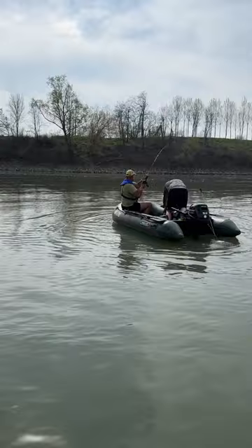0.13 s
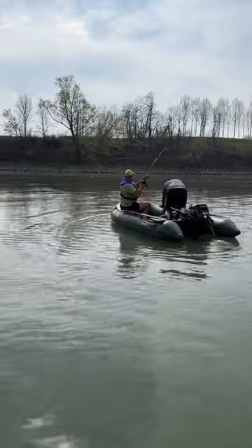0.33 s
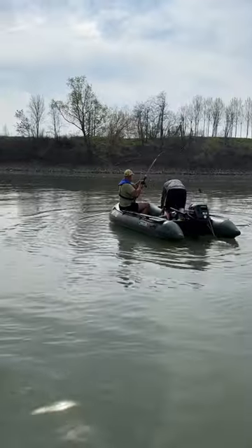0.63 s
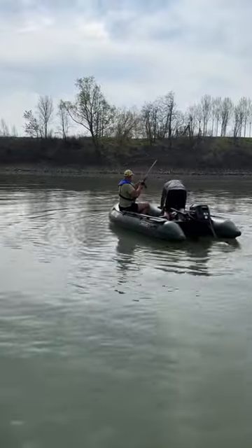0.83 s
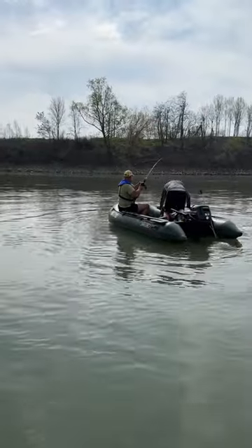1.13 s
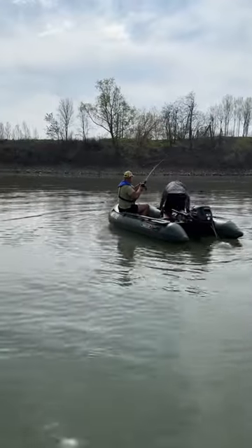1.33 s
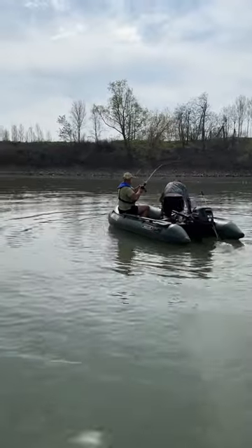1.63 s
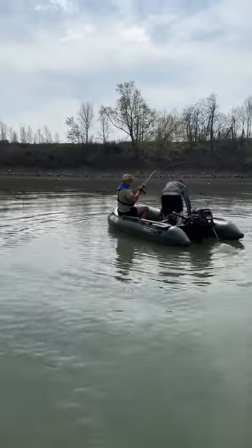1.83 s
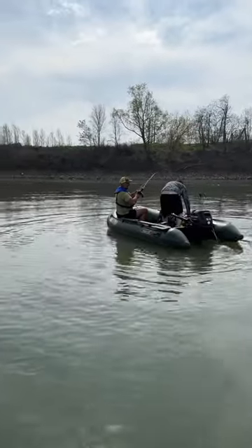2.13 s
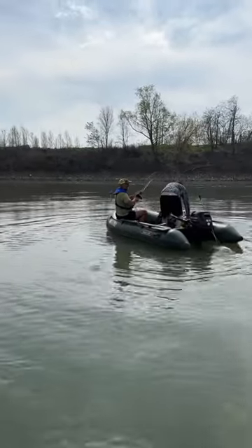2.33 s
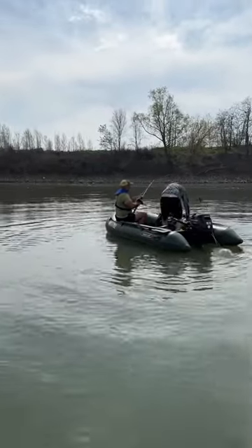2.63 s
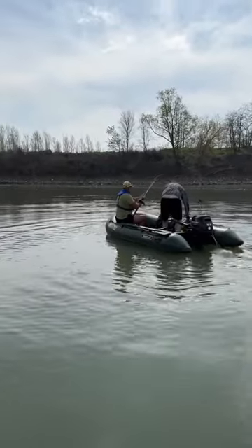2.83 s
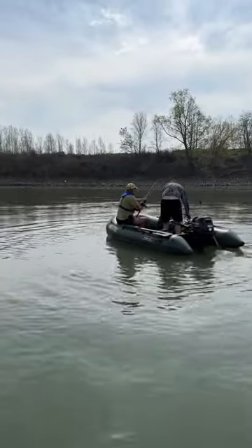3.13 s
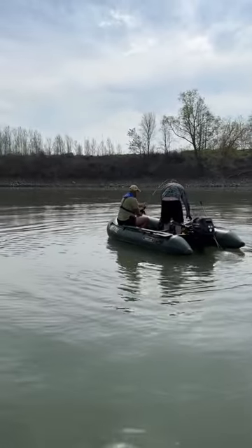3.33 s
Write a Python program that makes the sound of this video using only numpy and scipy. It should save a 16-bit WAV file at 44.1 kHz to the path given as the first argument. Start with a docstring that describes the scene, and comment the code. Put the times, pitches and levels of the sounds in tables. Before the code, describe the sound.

A small outboard motor idles with a steady low puttering hum, water trickling, one hard knock.

```python
"""On a calm river, two small outboard motors idle. The close one thuds: each firing puffs through its wet exhaust.
The slower one hums in steady tones, whirs in falling gear chirps, clatters in shaped noise and whines in bursts.
Something hard knocks on a boat and rattles: short ringing tones with bursts of noise.
A few drops plip as rising tones with tiny splashes; a thin stream patters as many random clicks over a hiss."""
import sys
import numpy as np
from scipy import signal
from scipy.fft import rfft, irfft
from scipy.io import wavfile

SR = 44100
rng = np.random.default_rng(int(sys.argv[2]) if len(sys.argv) > 2 else 0)


def materialize(psi):
    """Save the field psi as 16-bit PCM at rate SR to the path in sys.argv[1].

    A 1-D psi becomes a single channel; in a 2-D psi each row is a channel.
    """
    bounded = np.clip(np.atleast_2d(psi).T, -1, 1)
    quanta = np.round(bounded * 32767).astype(np.int16)
    wavfile.write(sys.argv[1], SR, quanta)


N = 153027
T, HZ = np.arange(N) / SR, np.fft.rfftfreq(N, 1 / SR)


def amp(db):
    """Turns decibels into gain."""
    return 10 ** (np.asarray(db) / 20)


def unit(x):
    """Scales a sound to an average (rms) strength of 1."""
    return x / np.sqrt(np.mean(x ** 2) + 1e-20)


def read(points, hz):
    """Reads a table between its points, on a log-frequency axis."""
    f, value = np.transpose(points)
    return np.interp(np.log(hz + 1e-6), np.log(f), value)


def curve(points):
    """Reads a table over time."""
    return np.interp(T, *np.transpose(points))


def add(mix, s, sound):
    """Mixes a sound in, starting at s seconds."""
    start = max(round(s * SR), 0)
    part = mix[..., start:][..., :sound.shape[-1]]
    part += sound[..., :part.shape[-1]]


def drift(rate_hz):
    """Makes a smooth random curve with rms 1; a higher rate changes faster."""
    slow = rfft(rng.standard_normal(N)) * np.exp(-(HZ / rate_hz) ** 2)
    return unit(irfft(slow, N))


def pan(db):
    """Gives left and right gains that differ by this many dB."""
    db = np.atleast_1d(db)
    return amp(np.array([db, -db]) / 2)


# how alike the two microphones hear a sound: (frequency [Hz], likeness [0-1])
LIKENESS = [(50, 1), (110, .05), (300, 0.72), (480, 0.39), (700, 0.19), (1100, 1), (1400, 0.7),
            (2230, 0.97), (2700, 0.51), (4400, 0.31), (5000, 1), (6500, 1), (9500, 0.59), (11000, 1)]
# how much louder the left one is: (frequency [Hz], left over right [dB])
BALANCE = [(80, -2), (200, -10.5), (320, -5), (460, -8.5), (600, -10), (750, -14), (900, -13.5),
           (1050, -8.5), (1400, -0.5), (1800, -2.5), (2250, 2.5), (3500, 3.5), (6500, 0), (12000, -0.5)]
# how far the left one is ahead: (frequency [Hz], phase lead [radians])
LEFT_LEAD = [(400, 0.5), (560, 1.56), (720, 2.5), (850, 1), (1100, -0.45), (1400, 1), (1700, -0.15),
             (2250, 0.65), (2800, 0.5), (4500, -0.35), (4900, 2.5), (5300, 2), (5900, -1.5), (7000, -0.5),
             (9000, -1.46), (11000, -3), (16000, -16)]


def spread(pair, gain):
    """Colours two unrelated signals and blends them as the two microphones hear them."""
    left, other = rfft(pair) * gain
    same = np.clip(read(LIKENESS, HZ), 0, 1)
    right = same * left + np.sqrt(1 - same ** 2) * other
    right = right * np.exp(-1j * read(LEFT_LEAD, HZ))
    return unit(irfft(np.array([left, right]) * pan(read(BALANCE, HZ)), N))


def turns_from(turns, at):
    """Distance in turns to the nearest moment when the engine cycle is at this angle."""
    return (turns - at + .5) % 1 - .5


def strokes(turns, table, base):
    """Level that swells at set angles of each engine cycle."""
    swells = sum(size * np.exp(-(turns_from(turns, at) / length) ** 2) for at, length, size in table)
    return base + swells


# pace of the close motor: (time [s], rate [firings/s])
FIRING_RATE = [(0, 25.852), (0.3, 24.963), (0.62, 25.31), (0.95, 24.798), (1.15, 25.568), (1.65, 25.286),
               (1.95, 24.607), (2.2, 24.347), (2.62, 24.657), (2.95, 24.144), (3.25, 24.196),
               (3.47, 23.417)]
# tone colour of its exhaust: (multiple of the average firing rate, relative level [dB])
EXHAUST_TONES = [(1, -47), (2, -7), (3, 0), (4, -4.5), (5, -14), (6, -17), (7, -20.5), (9, -31.5),
                 (12, -22), (16, -36)]
# rise and fall of the exhaust: (time [s], relative level [dB])
EXHAUST_LEVEL = [(0, -2), (.45, -1), (.7, 0), (1.25, -1), (1.5, 0.5), (2.0, -0.5), (2.8, -1.5), (3.47, 0.5)]
EXHAUST_DB, UNEVEN_DB, JITTER_S = -31, 0.65, 0.00019  # the last two vary each puff's size and moment
PUFF_TURN, PUFF_LEAN = 0.136, .33  # when a puff comes, in firings; its lopsidedness, in turns of phase
SMEAR_TURNS, PIPE_ORDER = .0045, 3.1  # strength of the delay; multiple that is delayed least


def exhaust():
    """One soft puff per firing swells and dies in the exhaust of the close motor."""
    rate = curve(FIRING_RATE)
    firings = np.cumsum(rate) / SR
    at = np.flatnonzero(np.diff(np.floor(firings - PUFF_TURN)))
    puffs = np.zeros(N)
    for s, (size, late) in zip(T[at], rng.standard_normal((len(at), 2))):
        add(puffs, s + JITTER_S * late, amp([UNEVEN_DB * size]))
    order = HZ / rate.mean()
    # tones leave the pipe later the further they lie from PIPE_ORDER
    smear = np.exp(-2j * np.pi * (PUFF_LEAN + SMEAR_TURNS * (order - PIPE_ORDER) ** 3))
    colour = amp(read(EXHAUST_TONES, order)) / (1 + (order / 20) ** 4)  # highest tones softened
    pipe = np.fft.fftshift(irfft(smear * colour, N))
    thuds = unit(signal.fftconvolve(puffs, pipe, "same"))
    return amp(EXHAUST_DB + curve(EXHAUST_LEVEL)) * pan(db=-1.0) * thuds


# pace of the slower motor: (time [s], rate [engine cycles/s])
CYCLE_RATE = [(0, 17.047), (0.5, 17.003), (0.77, 17.238), (0.95, 16.979), (1.5, 17.038), (1.76, 17.262),
              (2.14, 16.615), (2.35, 17.007), (2.82, 17.322), (3.05, 17.173), (3.22, 17.354),
              (3.47, 17.088)]


def slower_motor_turns():
    """Counts the engine cycles of the slower motor, so that its sounds keep the same pace."""
    return np.cumsum(curve(CYCLE_RATE)) / SR


# tones of the hum: (multiple of the cycle rate)
HUM_ORDERS = [3, 4, 6, 7, 8, 9, 10, 12, 14, 16, 17, 18, 19, 20, 22, 24, 26, 31, 32, 34, 48, 57, 64]
# one row for each of those tones: (level [dB rms], left over right [dB])
HUM_LEVELS = [(-52.5, 16), (-44, -2.5), (-47, 0), (-51, -10), (-53.5, -12), (-52.5, -2), (-49, -3),
              (-50, 0.5), (-56, -6.5), (-57, -11.5), (-56, -4), (-46, -5), (-54.5, -10), (-54, -8),
              (-57.5, -4), (-55.5, -8.5), (-59.5, -10), (-59.5, -13), (-50, -9), (-55.5, -0.5), (-52.5, -1),
              (-60.5, -1), (-58.5, 15.5)]
WAVER_DB, WANDER_TURNS = 1.0, 0.0007  # random sway of each tone's level and of the shared turning


def hum(turns):
    """The slower motor hums in wavering tones at whole multiples of its cycle rate."""
    turns = turns + WANDER_TURNS * drift(rate_hz=7.1)
    out = np.zeros((2, N))
    mean_rate = curve(CYCLE_RATE).mean()
    for order, (db, side_db) in zip(HUM_ORDERS, HUM_LEVELS):
        phase = 2 * np.pi * (order * turns + rng.random())
        lead = read(LEFT_LEAD, order * mean_rate)
        level = np.sqrt(2) * amp(db + WAVER_DB * drift(rate_hz=3.4))
        out += level * pan(side_db) * np.cos([phase, phase - lead])
    return out


# rise and fall of the whir: (time [s], level [dB])
WHIR_LEVEL = [(0, -53.5), (1.2, -53), (2.1, -51.5), (2.7, -48.5), (3.47, -51)]
# gear chirps in one cycle: (angle [turns], length [turns], strength, pitch [multiple of the cycle rate])
CHIRPS = [(.06, .07, .55, 67), (.24, .07, .6, 65), (.56, .115, 0.77, 66), (.78, .1, 0.98, 62.5)]
CHIRP_FALL_PER_TURN, CHIRP_ROUGH = 38, .3  # fall of the multiple; random phase sway in radians


def whir(turns):
    """Gear tone: the crank is kicked faster, then slows, so the same falling chirps return every cycle."""
    tone = 0
    for at, length, size, order in CHIRPS:
        since = turns_from(turns, at)
        swell = -(since / length) ** 2
        phase = 2 * np.pi * since * (order - CHIRP_FALL_PER_TURN * since / 2)
        tone = tone + size * np.exp(swell + 1j * phase)
    tone = tone * amp(1.0 * drift(rate_hz=15))
    tone = tone * np.exp(1j * CHIRP_ROUGH * drift(rate_hz=72))
    both_sides = np.real([tone, tone * np.exp(-.6j)])
    return amp(curve(WHIR_LEVEL)) * pan(db=4.5) * unit(both_sides)


# firing strokes in one cycle: (angle [turns], length [turns], strength)
FIRING_STROKES = [(.53, 0.18, 0.33), (.79, 0.11, 0.76), (.96, 0.14, 0.51)]
# valve strokes in one cycle: (angle [turns], length [turns], strength)
VALVE_STROKES = [(.17, 0.095, 0.59), (.69, 0.034, 0.35)]
# colour of the casing's noise: (frequency [Hz], relative level [dB])
CASING_COLOUR = [(20, -14), (45, -5.5), (80, 0.5), (150, -4), (215, -10.5), (300, -5), (400, -8.5),
                 (450, -8.5), (500, -14.5), (560, -9.5), (660, -16.5), (740, -10), (870, -17),
                 (1050, -13.5), (1200, -15), (1500, -21), (2500, -27), (5000, -62), (16000, -86)]
# colour of the valve gear's noise: (frequency [Hz], relative level [dB])
VALVE_COLOUR = [(200, -33), (1200, -2), (1900, -1.5), (2600, -1.5), (3400, -3.5), (4000, -5.5),
                (4900, -4.5), (5600, -10.5), (8000, -6), (10500, -10.5), (12000, -74), (16000, -53)]
# resonances of the cowling: (frequency [Hz], width [Hz], level [dB])
COWLING = [(1710, 42, -61.5), (3154, 29, -61.5), (6183, 64, -63), (7550, 85, -65.5)]
# rise and fall of the cowling's ringing: (time [s], relative level [dB])
RINGING_LEVEL = [(0, -1.5), (.7, 2), (1.5, 2), (2.2, -1.5), (2.7, 1), (3.47, 0.5)]
CASING_DB, VALVES_DB = -40, -49.5


def clatter(turns):
    """Firings shake the casing; valves rattle and ring the cowling, all made of noise that swells each cycle."""
    thumps, ticks, rings = rng.standard_normal((3, 2, N))
    thumps = thumps * strokes(turns, FIRING_STROKES, base=1.0)
    casing = spread(thumps, amp(read(CASING_COLOUR, HZ)))
    ticks = ticks * strokes(turns, VALVE_STROKES, base=1.0) * amp(1.96 * drift(rate_hz=66))
    valves = spread(ticks, amp(read(VALVE_COLOUR, HZ)))
    power = sum(amp(db) ** 2 / width / (1 + ((HZ - hz) / width) ** 2) ** 2 for hz, width, db in COWLING)
    rings = rings * amp(curve(RINGING_LEVEL)) * strokes(turns, VALVE_STROKES, base=0.44)
    cowling = spread(rings, np.sqrt(power))
    cowling_gain = np.linalg.norm([amp(db) for _, _, db in COWLING])  # all resonances together
    return amp(CASING_DB) * casing + amp(VALVES_DB) * valves + cowling_gain * cowling


# bursts of the whine: (time [s], level [dB])
WHINE_LEVEL = [(0, -53), (.06, -50.5), (.2, -51), (.42, -57), (.77, -51), (.95, -57.5), (1.35, -57.5),
               (1.48, -54), (1.57, -55.5), (1.67, -51.5), (1.77, -59), (2.28, -59), (2.42, -51.5),
               (2.74, -52.5), (2.96, -63), (3.14, -52.5), (3.47, -59)]
WHINE_HZ, WHINE_WANDER_HZ, WHINE_FLICKER_DB = 2240, 22, 3.2  # pitch, its random sway and the level's


def whine(turns):
    """A rough whine of the cowling, one unsteady tone, swells and fades in bursts."""
    pitch = WHINE_HZ + WHINE_WANDER_HZ * drift(rate_hz=88)
    phase = 2 * np.pi * np.cumsum(pitch) / SR
    level = strokes(turns, VALVE_STROKES, base=.9) * amp(WHINE_FLICKER_DB * drift(rate_hz=66))
    tone = level * np.cos([phase, phase - read(LEFT_LEAD, WHINE_HZ)])
    return amp(curve(WHINE_LEVEL)) * pan(db=3.5) * unit(tone)


# the knock and its rattle: (time [s], level [dB])
KNOCKS = [(2.038, -25), (2.0387, -15), (2.0407, -18), (2.0427, -26), (2.051, -33)]
# ringing tones of what is knocked: (frequency [Hz], relative level [dB], time to fall 60 dB [s])
KNOCK_MODES = [(667, -5, 0.032), (1203, 4.5, 0.048), (1404, -0.5, 0.028), (2205, -1, 0.043),
               (2600, -7, 0.025), (3300, -6, 0.091), (4450, -5, 0.04), (6100, -3, 0.021), (7400, -11, .02)]
CRACK_S, CRACK_TAIL_S, CRACK, CRACK_TAIL = 0.001, 0.012, 6.9, 1.4  # fade times, then strengths


def knock():
    """A hard object lands with a dry clack, rattles and rings briefly: fading tones plus bursts of noise."""
    out, t = np.zeros((2, N)), T[:SR // 5]
    crack_band = signal.butter(3, [700, 7500], "band", fs=SR)
    tail_band = signal.butter(4, [1200, 4900], "band", fs=SR)
    for s, db in KNOCKS:
        ring = 0
        for hz, level, t60 in KNOCK_MODES:
            start = rng.random() + 0.54 * rng.random((2, 1))  # differs left and right
            ring = ring + amp(level - 60 * t / t60) * np.sin(2 * np.pi * (hz * t + start))
        noise = rng.standard_normal(len(t)) + 1.16 * rng.standard_normal((2, len(t)))
        crack = signal.lfilter(*crack_band, noise * np.exp(-t / CRACK_S))
        tail = signal.lfilter(*tail_band, noise * np.exp(-t / CRACK_TAIL_S))
        hit = ring + CRACK * crack + CRACK_TAIL * tail
        add(out, s, amp(db) * hit / abs(hit).max())
    return out * pan(db=-1.0)


# larger drops: (time [s], level [dB], pitch [Hz], splash share [0-1])
PLIPS = [(.160, -37, 4470, 0), (0.568, -29.5, 6400, 0.47), (.636, -35, 8600, 0.3),
         (.946, -32.5, 7900, 0.27), (1.050, -28, 10500, 0.7), (1.383, -29, 8800, 1),
         (1.739, -25.5, 4600, 0.66), (2.905, -29.5, 1330, 0.24), (2.959, -32, 7450, 0.2),
         (3.004, -30.5, 4450, 0.4), (3.021, -28, 2500, 0.6), (3.157, -27.5, 2350, 0.3)]
PLIP_S, PLIP_GLIDE_PER_S = .0025, 14  # fade time; rise as a share of the pitch per second


def plips():
    """Larger drops: a tiny splash of noise and a bubble rising in pitch."""
    out, t = np.zeros((2, N)), T[:SR // 30]
    fade = (1 - np.exp(-t / 0.00029)) * np.exp(-t / PLIP_S)
    for s, db, hz, share in PLIPS:
        phase = 2 * np.pi * hz * (t + PLIP_GLIDE_PER_S * t ** 2 / 2)
        bubble = np.sin([phase, phase - read(LEFT_LEAD, hz) / 2])
        splash_band = signal.butter(4, [hz * 0.43, min(hz * 2.7, 11800)], "band", fs=SR)
        splash = signal.lfilter(*splash_band, rng.standard_normal((2, len(t))))
        add(out, s, amp(db) * fade * ((1 - share) * bubble + share * splash))
    return out


# colour of the water: (frequency [Hz], relative level [dB])
WATER_COLOUR = [(100, -25), (1500, 0.5), (4000, -1.5), (5300, -7), (6500, -1.5), (8000, -4), (9200, -2),
                (10500, -5), (11200, 4.5), (12000, -91), (15500, -9), (17000, -36)]
WATER_DB, DROPS_PER_S, DROP_SPREAD_DB = -53.5, 2500, 3.5


def water():
    """Dense patter of tiny drops, clicks of random size and moment, over a soft hiss."""
    size = amp(DROP_SPREAD_DB * np.minimum(rng.exponential(1, N), 5))
    size = size * (rng.random(N) < DROPS_PER_S / SR)
    drops, hiss = rng.standard_normal((2, 2, N))
    patter = unit(size * drops) + 0.47 * hiss
    return amp(WATER_DB) * spread(patter, amp(read(WATER_COLOUR, HZ)))


def scene():
    """Both motors, the knock, the plips and the water together."""
    turns = slower_motor_turns()
    slower_motor = hum(turns) + whir(turns) + clatter(turns) + whine(turns)
    return exhaust() + slower_motor + knock() + plips() + water()


EDGE_HZ = 15900


def record(dry):
    """The recorder's band limit: a low-pass filter takes away the highest treble."""
    low_pass = signal.firwin(511, EDGE_HZ, window=("kaiser", 9), fs=SR)
    return signal.oaconvolve(dry, low_pass[None], "same")


dry = scene()
out = record(dry)
materialize(out)
```